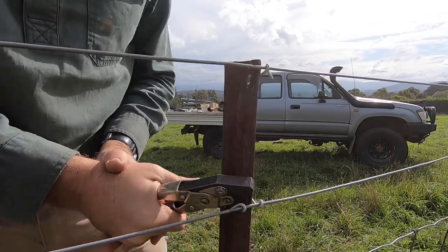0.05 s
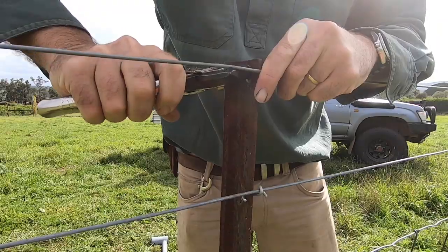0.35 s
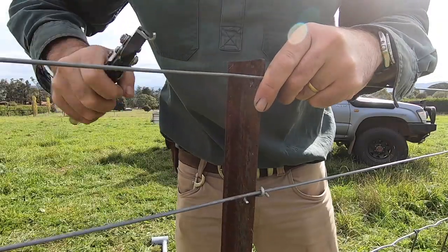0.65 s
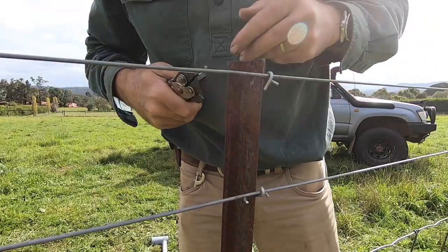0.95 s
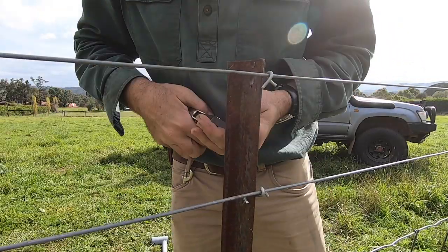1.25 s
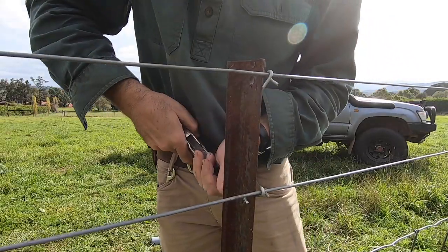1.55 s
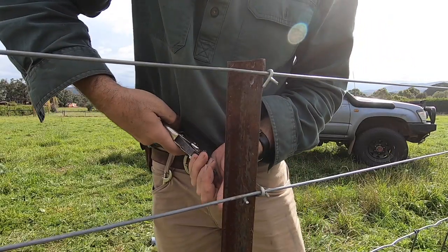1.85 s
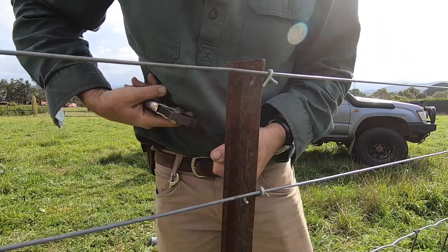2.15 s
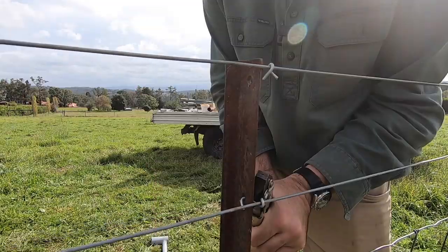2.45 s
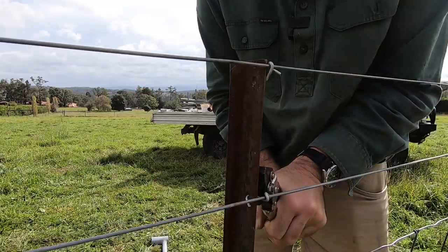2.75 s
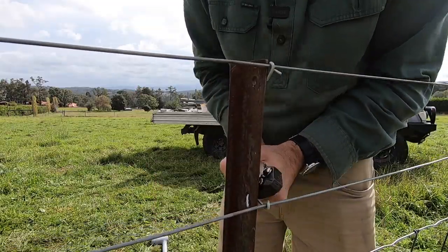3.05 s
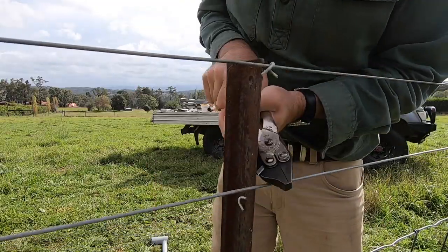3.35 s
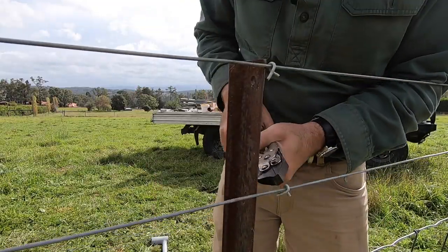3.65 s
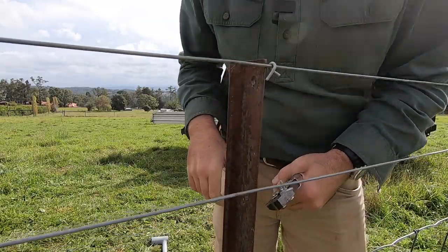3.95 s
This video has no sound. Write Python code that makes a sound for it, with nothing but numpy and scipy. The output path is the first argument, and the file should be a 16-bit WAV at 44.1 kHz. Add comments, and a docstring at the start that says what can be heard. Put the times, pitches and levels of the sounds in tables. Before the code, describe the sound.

Steel pliers click and clack on fence wire, with wind buffeting the microphone.

```python
"""Fencing pliers in a paddock

Close to the microphone, steel pliers snap, rattle and scrape on wire at a metal post.
Hard contacts knock the handles and set the jaws, wire and small clips ringing; sleeves rustle.
After the first clacks, wind buffets the microphone and single eddies thump its port.
The microphone's noise floor gives way to quiet field noise; far off, a tiny bird twitters."""
import sys
import numpy as np
from scipy import signal
from scipy.fft import rfft, irfft, next_fast_len
from scipy.io import wavfile
from scipy.ndimage import uniform_filter1d

SR = 44100
rng = np.random.default_rng(int(sys.argv[2]) if len(sys.argv) > 2 else 0)


def pcm_store(signal):
    """Save signal as 16-bit PCM."""
    levels = np.round(np.clip(np.atleast_2d(signal), -1, 1) * 32767)
    wavfile.write(sys.argv[1], SR, levels.astype(np.int16).T)


N = 176400

# steel contacts of the pliers: t/s, level/dB, centre f/Hz, width/octaves, t60/s
CONTACTS = [(0.0906, -11.5, 2820, 0.92, 0.021), (.144, -0.5, 3240, 1, 0.023),
            (0.1496, -20, 5030, 0.76, 0.12), (.449, -9.5, 5000, 0.97, 0.024),
            (.458, -11.5, 5400, 5.4, 0.052), (0.4722, -26, 8000, 1.4, .03), (.5224, -2, 7500, .8, .019),
            (.530, -18, 9000, .8, .03), (.5342, -12, 6000, .9, .04), (.552, -21, 5000, 1., .07),
            (1.288, -17.5, 4700, 1.25, 0.019), (1.593, -24, 1800, 0.67, 0.018),
            (1.623, -26.5, 2480, 1.4, 0.021), (1.852, -30, 3900, 0.77, .015),
            (2.08, -28.5, 3350, 0.65, 0.062), (2.515, -31, 3500, 1.1, 0.017), (2.696, -33, 9000, 1, 0.018),
            (2.727, -34.5, 2000, 1.4, 0.034), (2.79, -27.5, 3820, 1.5, 0.013),
            (2.988, -19, 4830, 1.77, 0.026), (3.0516, -32, 6500, 1, 0.017),
            (3.074, -31.5, 4000, 0.44, 0.018), (3.097, -23.5, 1860, 1.01, 0.04),
            (3.3015, 3, 3560, 2.45, 0.015), (3.309, -15, 6350, 1.2, 0.074),
            (3.3228, -14.5, 3700, 0.89, 0.087), (3.38, -11, 3670, 2.4, 0.01),
            (3.4271, -6, 8150, 1.2, 0.011), (3.471, -24, 5000, 1.5, 0.083), (3.4957, -17, 8000, 1.2, .06),
            (3.5881, -16, 4950, 1.4, 0.015), (3.645, -25.5, 5000, 1.8, 0.0172),
            (3.705, -28, 6460, 2.5, 0.044), (3.9018, -23.5, 7460, 1.8, 0.074)]
# colour of the pliers' body: f/Hz, level/dB
BODY_COLOUR = [(200, 8), (1050, -7.5), (1500, 6.5), (1900, -6), (2250, 1.5), (2950, 1), (4300, -1.5),
               (5050, -1.5), (5700, -3.5), (7600, -1.5), (9000, -4), (9800, -5), (12000, -5.5),
               (16000, -15)]
# dull knocks of the handles: t/s, level/dB, centre f/Hz, t60/s
HANDLE_KNOCKS = [(.144, -16.5, 450, 0.0236), (.449, -13.5, 417, 0.031), (.459, -21.5, 395, 0.081),
                 (3.3006, -27.5, 600, 0.1)]
# modes of each ringing part, by name: f/Hz, level/dB, t60/s
PART_MODES = {"jaw": [(1520, 5.5, 0.026), (2540, -6, 0.035), (3770, -15, 0.061)], "clip": [(8043, -9, .22),
              (12080, -5, .09), (12160, 0, .12)], "wire": [(2176, -1, 0.045), (2390, -14.5, 0.081),
              (2785, 8, 0.023), (2987, 17, 0.02), (3165, -19, 0.25), (4400, -3, 0.14), (5870, -7, 0.133),
              (7850, -23, .14)], "small link": [(9500, -7.5, 0.19), (9400, -10, .06), (13600, -13, .1)],
              "spring": [(5625, 0.5, 0.055), (5800, -17, .06), (7810, -1, 0.043)],
              "loose clip": [(9880, -0.5, 0.29), (10000, -7, .18), (10030, -8, .12), (13490, -5, .18),
              (13560, -2, .2)]}
# blows that set a part ringing: t/s, level/dB, part
PART_BLOWS = [(.144, -9, "jaw"), (.149, -24, "clip"), (.172, -30, "clip"), (.5342, -24.5, "jaw"),
              (.5342, -29, "wire"), (.551, -32.5, "wire"), (0.856, -44, "spring"),
              (0.934, -41.5, "small link"), (1.365, -32, "small link"), (2.697, -41, "small link"),
              (2.788, -50, "wire"), (2.812, -43, "wire"), (3.199, -48, "wire"), (3.24, -40, "wire"),
              (3.3012, -15.5, "wire"), (3.338, -16.5, "spring"), (3.587, -38, "loose clip"),
              (3.652, -43, "loose clip"), (3.743, -33.5, "loose clip"), (3.792, -40, "loose clip"),
              (3.9, -39, "loose clip"), (3.98, -44, "loose clip")]
# steel sliding on wire: t/s, length/s, level/dB, centre f/Hz, width/octaves
WIRE_SCRAPES = [(0.158, 0.094, -30.5, 3600, 3.3), (0.232, 0.062, -27, 6230, 1.2),
                (0.937, .08, -40.5, 7900, 1.02), (3.335, .1, -32.5, 8500, 0.51),
                (3.476, 0.078, -30.5, 6050, 1.7), (3.586, 0.073, -30.5, 3660, 0.95),
                (3.792, 0.032, -33.5, 7000, 2.6)]
# wire creaking in the jaws: t/s, length/s, level/dB, centre f/Hz
WIRE_CREAKS = [(2.779, 0.011, -41.5, 2930), (2.812, 0.013, -49, 2900), (3.072, .06, -47, 2800),
               (3.202, .03, -43, 3200), (3.238, 0.044, -38, 3600), (3.371, .038, -20, 4000)]
# modes of the gripped wire: f/Hz, level/dB, t60/s
GRIPPED_WIRE_MODES = [(1540, -5, 0.03), (2200, -6, 0.024), (2770, -9, 0.026), (3070, -5, 0.03),
                      (3260, 3.5, 0.015), (3660, 5, 0.022), (3900, -4, 0.019), (4440, -4.5, 0.021),
                      (4480, -13, .035)]
# wind rumble on the microphone: t/s, level/dB
RUMBLE_LEVEL = [(.62, -62), (.648, -10.5), (.71, -14), (.75, -27), (.785, -28), (.81, -21), (.9, -11),
                (1.0, -12.5), (1.12, -12.5), (1.2, -10), (1.3, -20.5), (1.46, -11), (1.57, -11),
                (1.74, -16.5), (1.78, -26), (1.83, -19), (2.0, -17), (2.3, -14.5), (2.5, -20.5),
                (2.6, -9.5), (2.66, -17.5), (2.86, -18.5), (2.94, -17.5), (3.1, -11.5), (3.28, -18),
                (3.48, -19.5), (3.6, -18), (3.7, -19), (4, -17.5)]
# colour of the rumble: f/Hz, level/dB
RUMBLE_COLOUR = [(20, -41), (40, -10.5), (65, -2), (100, 3), (150, 1), (230, -5), (310, -14), (450, -28.5),
                 (650, -33), (1200, -43), (3000, -95)]
# the wind's upper flutter: t/s, level/dB
FLUTTER_LEVEL = [(.62, -81), (.69, -9.5), (.75, -49), (.82, -20), (1.05, -31), (1.22, -12), (1.4, -27),
                 (1.57, -16), (1.8, -24.5), (2.1, -40), (2.42, -24), (2.75, -44), (2.95, -24.5), (3.3, -45),
                 (4, -59)]
# colour of the flutter: f/Hz, level/dB
FLUTTER_COLOUR = [(100, -5), (200, 7.5), (310, 11), (480, -11), (700, -26), (1400, -39), (4000, -73)]
# eddies at the microphone port: t/s, level/dB, f/Hz, level of the small edge eddies/dB
PORT_EDDIES = [(.68, -2.5, 302, -1.5), (.687, -8, 208, -1.5), (.695, 0, 166, -9), (0.796, -1, 127, -24),
               (0.815, -3.5, 250, -5.5), (0.83, -2, 171, -12), (.858, -1, 196, -11), (0.892, -3, 243, -12),
               (.947, -4, 216, -14), (1.177, 1.5, 204, -22), (1.211, -6.5, 178, -12),
               (1.233, 0.5, 177, -28), (1.263, 0, 271, -34), (1.343, -1, 197, -15), (1.512, -4, 160, -20),
               (1.526, -6, 253, -11), (1.557, -2.5, 282, -5.5), (1.577, 1.5, 195, -14),
               (1.621, -1.5, 186, -34), (1.652, -1.5, 223, -22), (1.691, 2.5, 258, -2.5),
               (1.74, 1.5, 163, -13), (1.819, -3.5, 253, -12), (1.977, -5, 124, -35),
               (2.138, -6.5, 145, -29), (2.29, -1.5, 146, -45), (2.381, -2, 155, -38),
               (2.423, -1, 207, -18), (2.555, -12, 130, -19), (2.601, -4.5, 164, -29),
               (2.734, -4.5, 138, -37), (2.899, -0.5, 192, -30), (2.941, 3, 147, -18),
               (3.031, -2.5, 159, -30), (3.117, -3, 157, -12.5), (3.301, -8, 130, -47),
               (3.427, -4, 153, -36), (3.547, -2, 81.5, -28), (3.579, -4, 170, -20),
               (3.628, -6.5, 167, -19), (3.735, -3.5, 99, -32), (3.859, 0.5, 167, -6),
               (3.958, -4, 105, -30)]
# sleeve rustle: t/s, level/dB
SLEEVE_LEVEL = [(.6, -35), (.7, -49.5), (.88, -45), (.98, -41.5), (1.12, -41), (1.26, -42.5), (1.31, -38),
                (1.46, -39), (1.68, -43), (1.75, -43.5), (1.98, -48), (2.12, -39.5), (2.25, -45),
                (2.52, -46.5), (2.64, -47.5), (2.76, -44.5), (3.27, -37.5), (3.7, -36), (4, -38.5)]
# colour of the cloth: f/Hz, level/dB
SLEEVE_COLOUR = [(500, 0), (1500, 1), (3000, 1.5), (6500, -1), (10000, -6), (16000, -19)]
# background noise, first the microphone's noise floor, then the quiet field: t/s, level/dB
BACKGROUND_LEVEL = [(0, -33), (.2, -33), (.24, -27), (.3, -36.5), (.6, -36), (.7, -48.5), (2.7, -41),
                    (3.4, -41.5), (4, -45)]
# colour of the background noise: f/Hz, level/dB
BACKGROUND_COLOUR = [(15, -42), (25, 1), (64, 15), (335, 5), (427, 6), (624, 2), (818, 2.5), (2840, -9),
                     (4140, -9.5), (13200, -32), (16000, -18)]

RING_LENGTH_S = .3


def pliers(tail_db=-19, tail_t60_s=.12, shimmer_db=4):
    """Close up, each steel contact cracks and leaves a dense shimmer; the handles knock dully."""
    out, t = np.zeros(N), seconds(RING_LENGTH_S)
    for start, db, hz, octaves, t60 in CONTACTS:
        crack = colour(grit(len(t), spread_db=4.5), BODY_COLOUR, hz, octaves) * fade(t, t60)
        steel = rng.standard_normal(len(t)) + undb(shimmer_db) * shimmer(len(t), count=110)
        tail = colour(steel, BODY_COLOUR, hz, octaves) * fade(t, tail_t60_s)
        add(out, start, undb(db) * (crack + undb(tail_db) * tail))
    for start, db, hz, t60 in HANDLE_KNOCKS:
        knock = colour(rng.standard_normal(len(t)), BODY_COLOUR, hz, octaves=.89)
        add(out, start, undb(db) * knock * fade(t, t60))
    return out


def shimmer(size, count):
    """Many close steel modes at random pitches; rms 1."""
    lines = np.zeros(size // 2 + 1, complex)
    strengths = rng.standard_normal(count) + 1j * rng.standard_normal(count)
    lines[rng.integers(len(lines) // 20, len(lines) * 3 // 4, count)] = strengths
    return unit(irfft(lines, size))


def ringing_parts():
    """At the post, jaw, wire, spring, link and clips ring on in their own modes when struck."""
    out = np.zeros(N)
    for start, db, part in PART_BLOWS:
        add(out, start, undb(db) * ring(PART_MODES[part]))
    return out


def ring(modes, rattle_per_s=110, rattle_db=5):
    """Damped sines of a struck part, each unsteady as the part rattles."""
    t = seconds(.5)
    out = np.zeros(len(t))
    for hz, db, t60 in modes:
        rattle = rattle_db * walk(len(t), rattle_per_s) * (1 - fade(t, t60=.019))
        out += undb(db + rattle) * fade(t, t60) * np.sin(2 * np.pi * hz * t)
    return out


def scrapes():
    """Steel slides along the wire in gritty strokes that swell and fall away."""
    out = np.zeros(N)
    for start, length, db, hz, octaves in WIRE_SCRAPES:
        t = seconds(length)
        friction = grit(next_fast_len(len(t)), spread_db=2.5)
        stroke = colour(friction, BODY_COLOUR, hz, octaves)[:len(t)]
        add(out, start, undb(db) * stroke * np.sqrt(np.sin(np.pi * t / length)))
    return out


def creaks(slips_per_s=1400):
    """The wire sticks and slips in the jaws; every slip rings its modes."""
    out, wire = np.zeros(N), ring(GRIPPED_WIRE_MODES)
    for start, length, db, hz in WIRE_CREAKS:
        size = int(length * SR)
        slips = (rng.random(SR) < slips_per_s / SR) * rng.uniform(.32, 1, SR)
        ringing = signal.fftconvolve(slips[:size], wire)[:SR // 2]
        creak = colour(ringing, BODY_COLOUR, hz, octaves=1)
        add(out, start, undb(db) * creak / (np.std(creak[:size]) + 1e-9))
    return out


def wind(buffets_per_s=38, rumble_swing_db=3, flutter_swing_db=5):
    """Wind right on the microphone: rumble that comes in buffets, brighter in the strong ones."""
    buffet = walk(N, buffets_per_s)
    rumble = colour(rng.standard_normal(N) * undb(rumble_swing_db * buffet), RUMBLE_COLOUR)
    flutter = colour(rng.standard_normal(N) * undb(flutter_swing_db * buffet), FLUTTER_COLOUR)
    return rumble * curve(RUMBLE_LEVEL) + flutter * curve(FLUTTER_LEVEL)


def eddies(edge_hz=355, edge_spread_s=.00421, half_span_s=.03):
    """Single eddies thump the microphone port, each with three small ones at its edge."""
    out, t = np.zeros(N), seconds(2 * half_span_s) - half_span_s
    for centre, db, hz, edge_db in PORT_EDDIES:
        edge = sum(swirl(t - edge_spread_s * late, edge_hz * 2 ** (.35 * pitch), cycles=.48)
                   for late, pitch in rng.uniform(-.955, 1, size=(3, 2)))
        thump = undb(db) * swirl(t, hz, cycles=.44)
        add(out, centre - half_span_s, thump + undb(edge_db) * edge / np.sqrt(3))
    return out


def swirl(t, hz, cycles):
    """Pressure of a passing eddy: a short swing around t = 0."""
    return np.exp(-(t * hz / cycles) ** 2 / 2) * np.sin(2 * np.pi * hz * t)


def sleeves():
    """Cloth rubs near the microphone with a soft, grainy rustle."""
    return colour(grit(N, spread_db=2.5), SLEEVE_COLOUR) * curve(SLEEVE_LEVEL)


def bird(from_s=.7, to_s=2.78, note_s=.032, spacing_s=.055, crest_hz=8500, arch_depth=.1, warble=.025):
    """Far off, a thin, uneven run of arched, warbled notes, blurred by distance."""
    notes, t = np.zeros(N), seconds(note_s)
    arch = np.sin(np.pi * t / note_s)
    for start in np.arange(from_s, to_s, spacing_s):
        late, pitch, strength = rng.standard_normal(3)
        hz = crest_hz * (1 + .03 * pitch + arch_depth * (arch - 1) + warble * walk(len(t), 300))
        note = arch * np.sin(2 * np.pi * np.cumsum(hz) / SR)
        add(notes, start + .016 * late, undb(-50 + 3 * strength) * note)
    t = seconds(RING_LENGTH_S)
    echo = rng.standard_normal(len(t)) * fade(t, t60=.2)
    blurred = signal.fftconvolve(notes, echo / np.linalg.norm(echo))[:N]
    return (notes + blurred) / 2


def background_noise():
    """The microphone's louder noise floor for the first 0.6 s, then quiet field noise."""
    return colour(rng.standard_normal(N), BACKGROUND_COLOUR) * curve(BACKGROUND_LEVEL)


def colour(x, points, hz=1000, octaves=np.inf):
    """Shape by (f/Hz, level/dB) points and a broad hump around hz; rms 1."""
    log_f = np.log2(np.fft.rfftfreq(len(x), 1 / SR) + 1)
    point_hz, point_db = np.array(points).T
    gain = undb(np.interp(log_f, np.log2(point_hz), point_db))
    hump = 1 / (1 + ((log_f - np.log2(hz)) / octaves) ** 2 / 2) ** 2
    return unit(irfft(rfft(x) * hump * gain, len(x)))


def grit(size, spread_db):
    """Noise whose strength jumps from one tiny grain to the next."""
    grains = np.repeat(rng.standard_normal(size // 32 + 1), 32)[:size]
    return rng.standard_normal(size) * undb(spread_db * grains)


def walk(size, rate):
    """Smooth random wander of spread near 1, at rate steps a second."""
    hold = int(SR / rate)
    steps = np.repeat(rng.standard_normal(size // hold + 1), hold)
    return 1.2 * uniform_filter1d(steps, hold)[:size]


def fade(t, t60):
    """Exponential decay, 60 dB down at t60."""
    return np.exp(-np.log(1000) * t / t60)


def curve(points):
    """Gain over time from (t/s, level/dB) points."""
    return undb(np.interp(np.arange(N) / SR, *np.array(points).T))


def add(out, start, x):
    """Mix x in at start seconds."""
    i = min(max(int(start * SR), 0), N)
    out[i:i + len(x)] += x[:N - i]


def undb(db):
    """Decibels to gain."""
    return 10 ** (np.asarray(db) / 20)


def unit(x):
    """Scale to rms 1."""
    return x / (np.std(x) + 1e-12)


def seconds(length):
    """Time axis of a given length."""
    return np.arange(int(length * SR)) / SR


def scene():
    """One microphone by the post: tool, wind and sleeves close, the bird far off, noise beneath."""
    tool = pliers() + ringing_parts() + scrapes() + creaks()
    return (tool + wind() + eddies() + sleeves() + bird() + background_noise())[None]


def record(dry, ceiling=.92, top_hz=16100):
    """The recorder rounds off the highest peaks and cuts the top treble."""
    rounded = dry / (1 + (dry / ceiling) ** 8) ** (1 / 8)
    return signal.sosfilt(signal.ellip(10, .2, 80, top_hz, fs=SR, output="sos"), rounded)


dry = scene()
out = record(dry)
pcm_store(out)
```